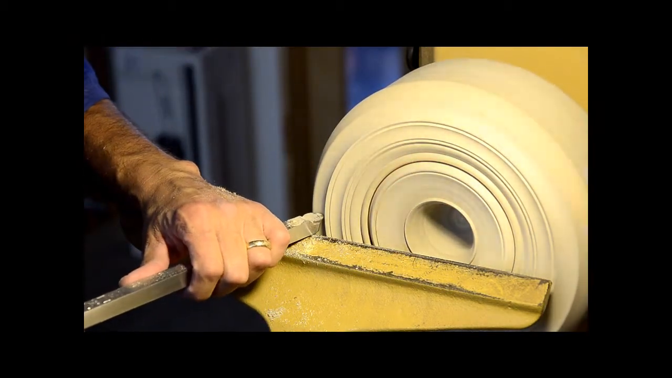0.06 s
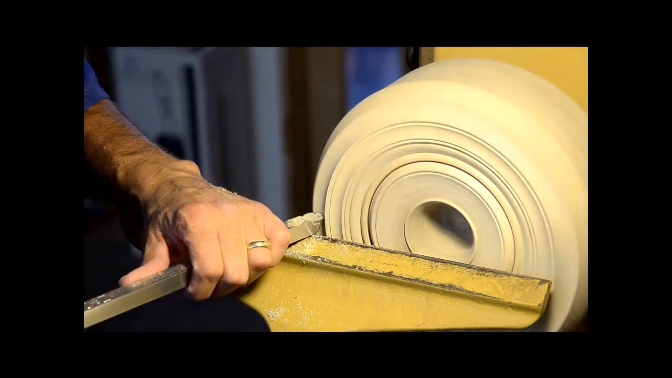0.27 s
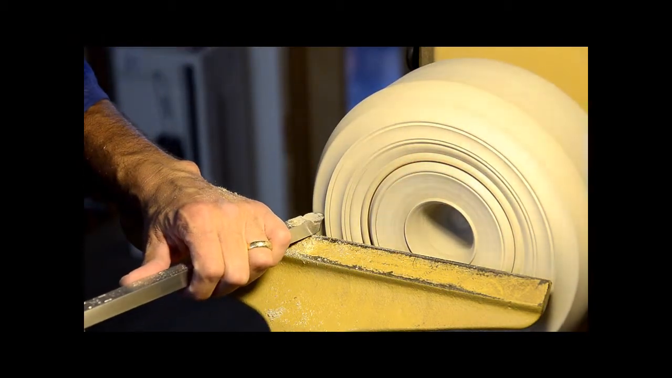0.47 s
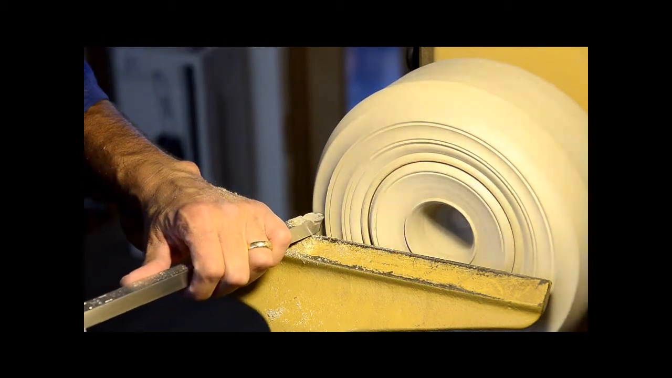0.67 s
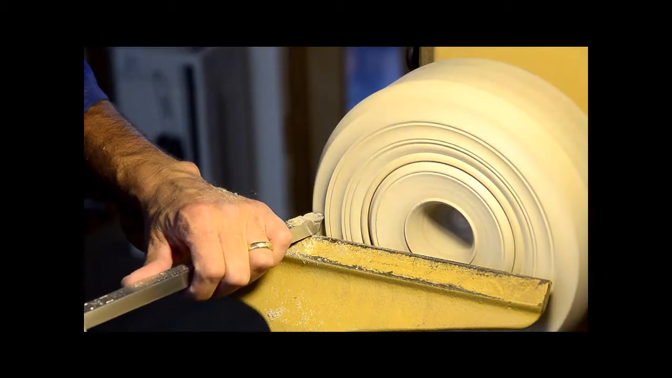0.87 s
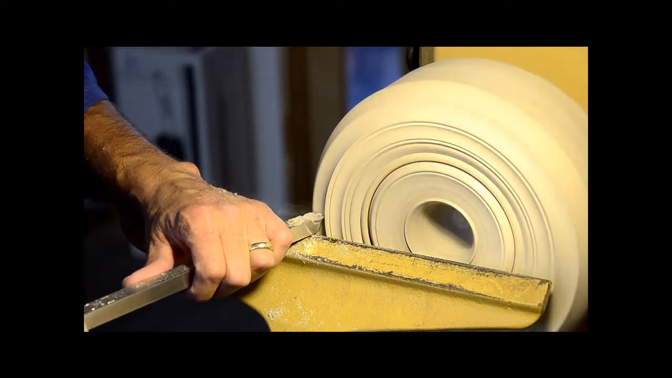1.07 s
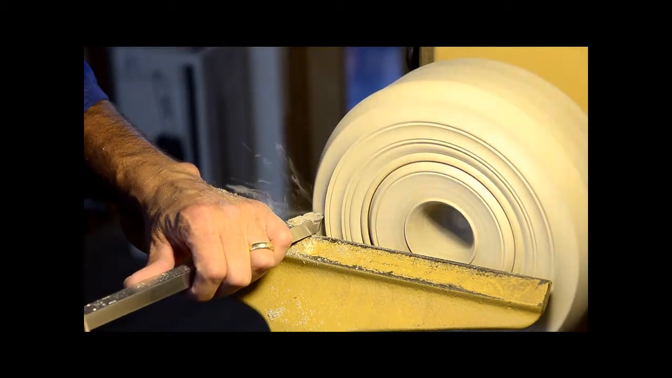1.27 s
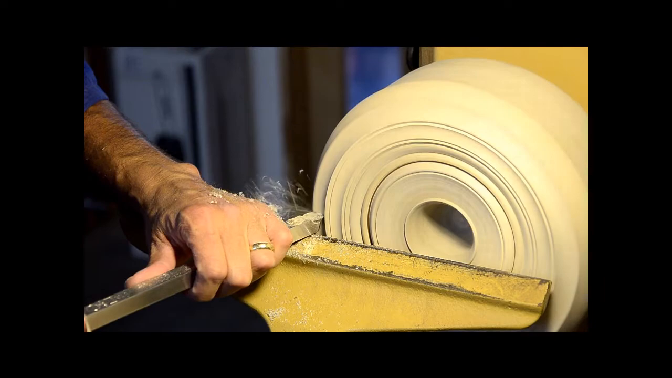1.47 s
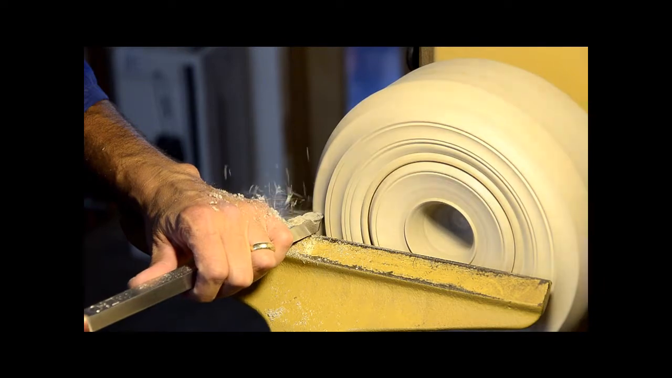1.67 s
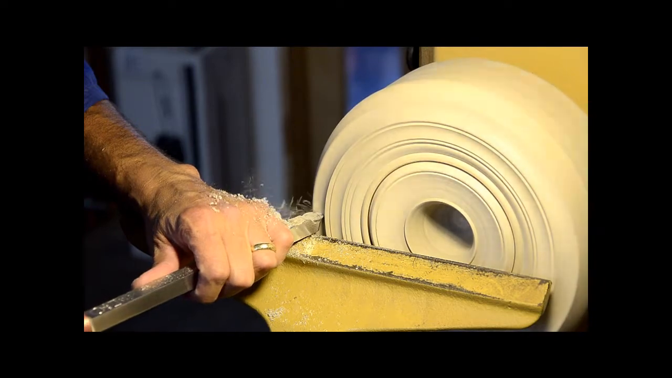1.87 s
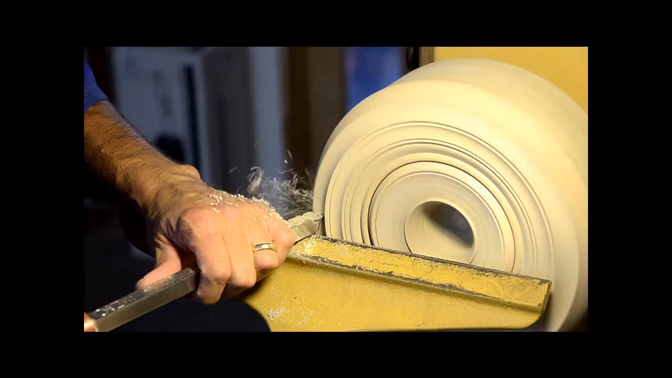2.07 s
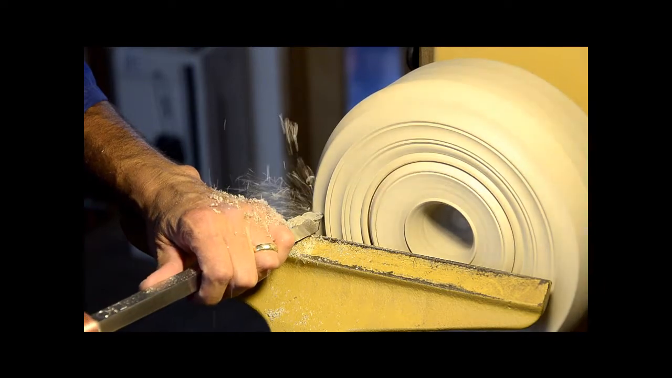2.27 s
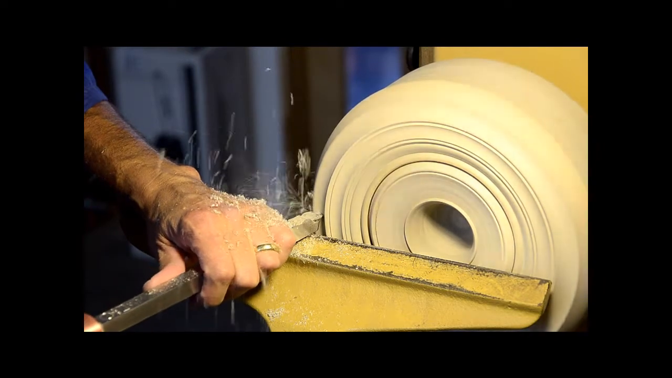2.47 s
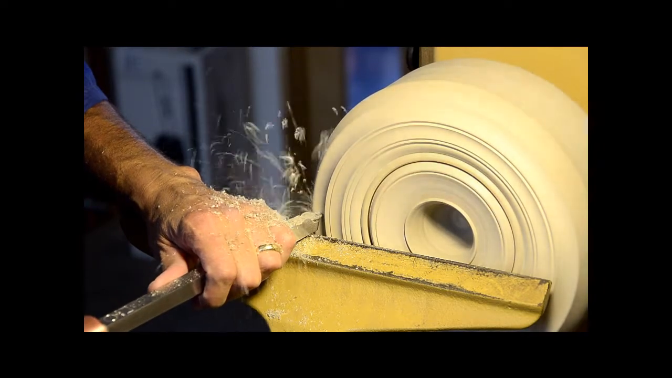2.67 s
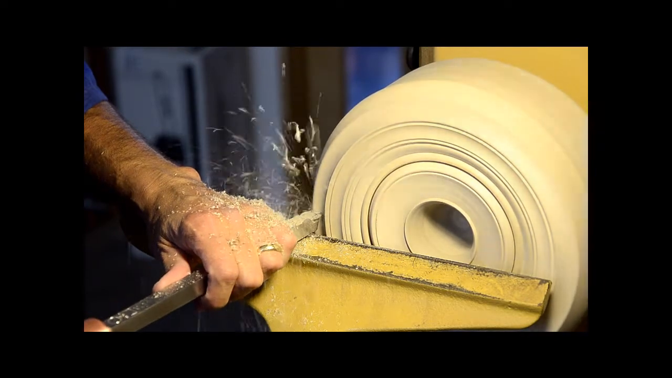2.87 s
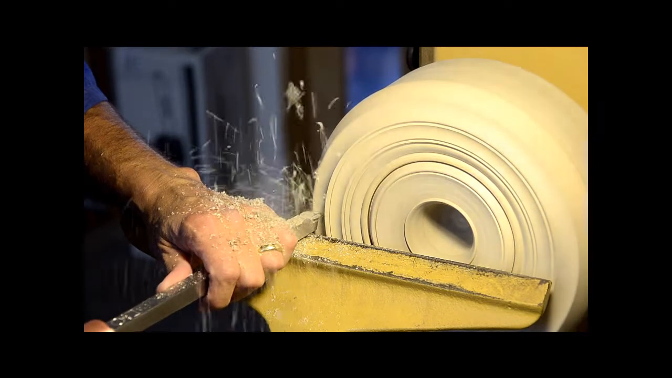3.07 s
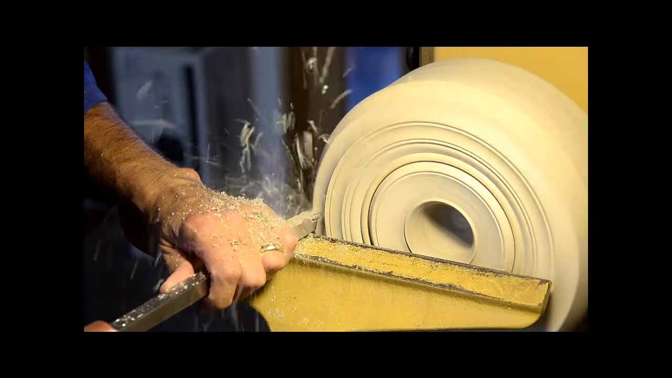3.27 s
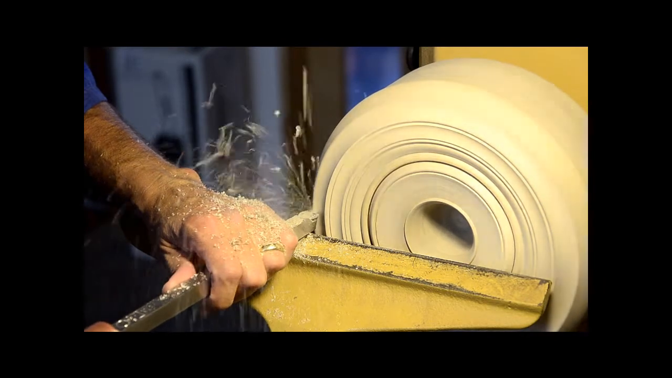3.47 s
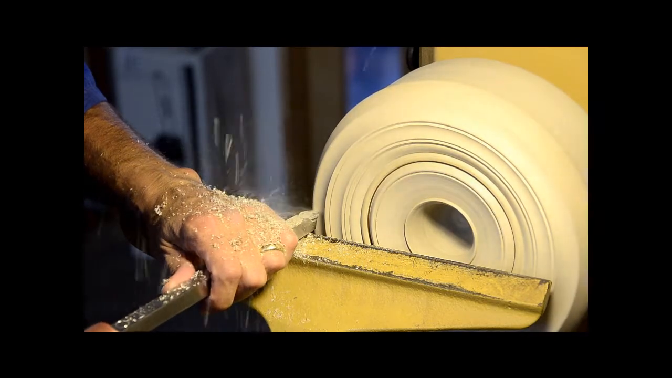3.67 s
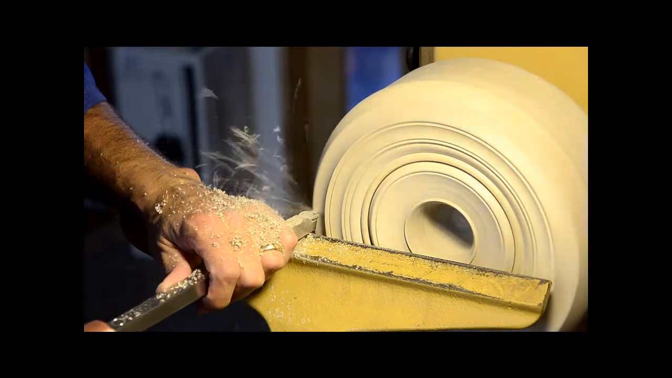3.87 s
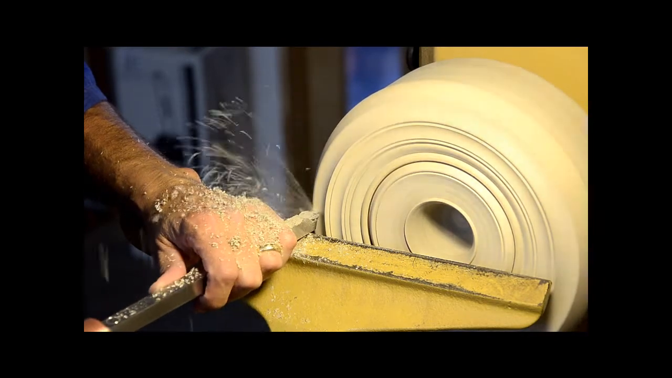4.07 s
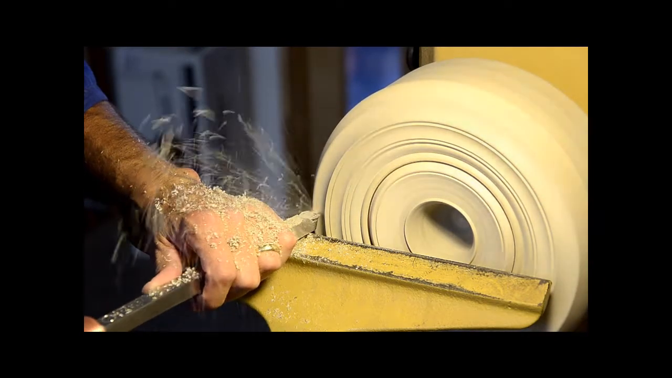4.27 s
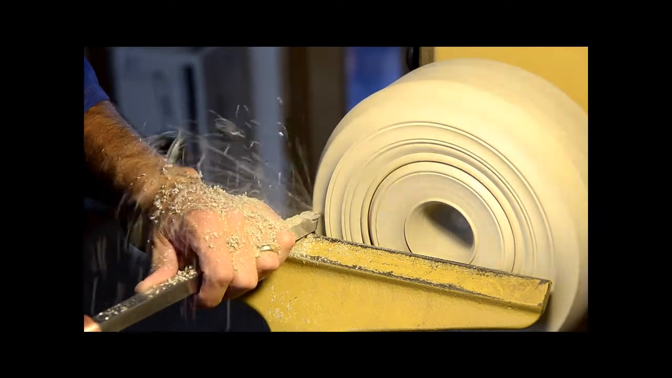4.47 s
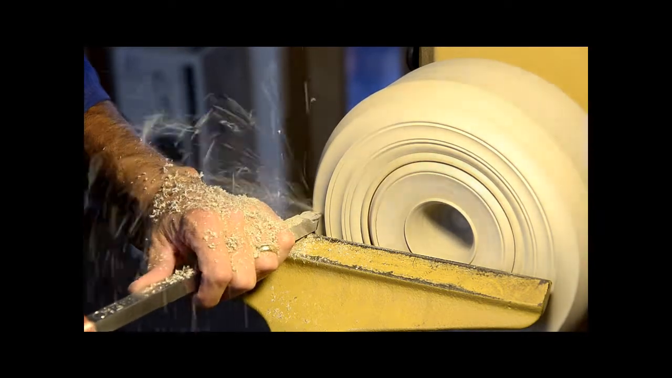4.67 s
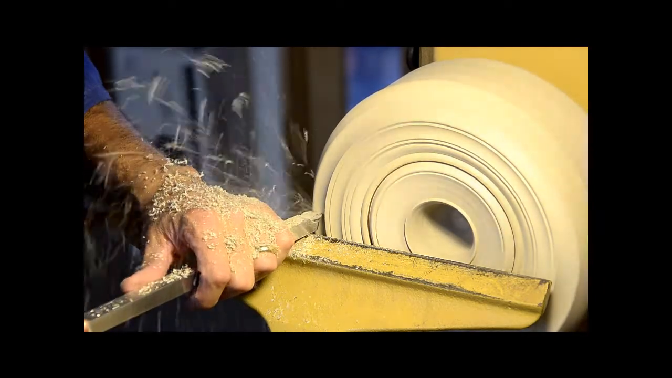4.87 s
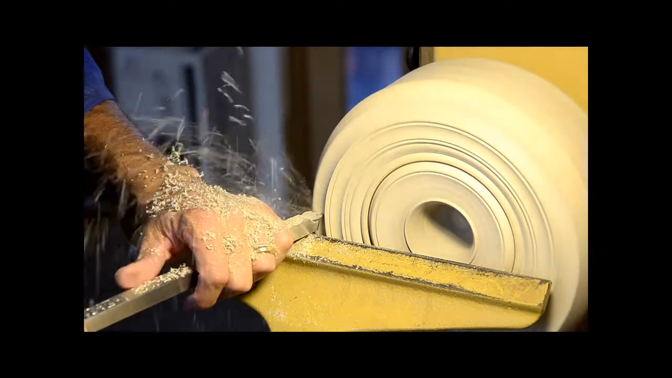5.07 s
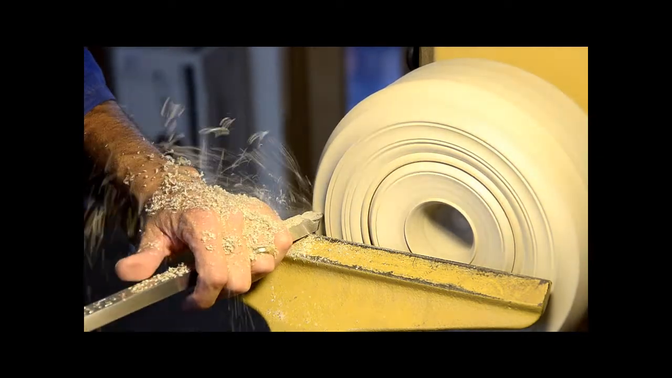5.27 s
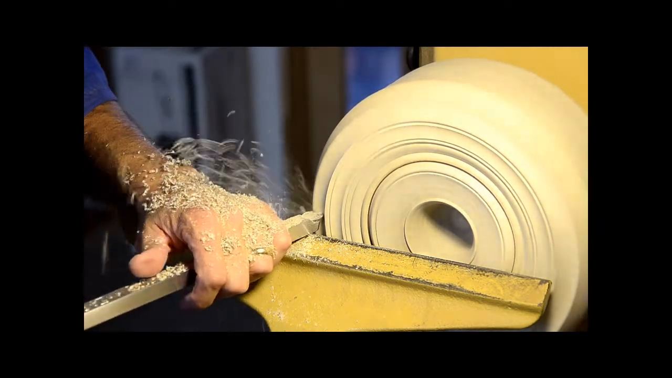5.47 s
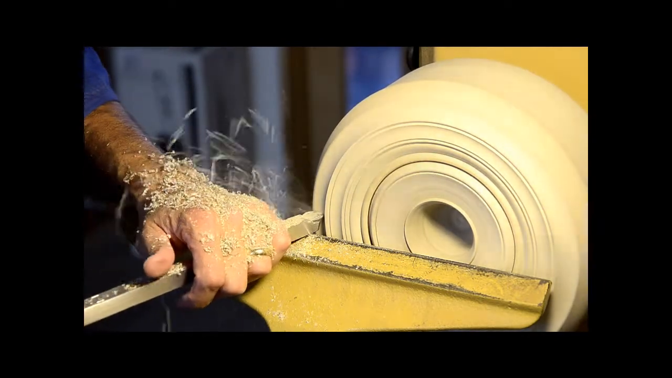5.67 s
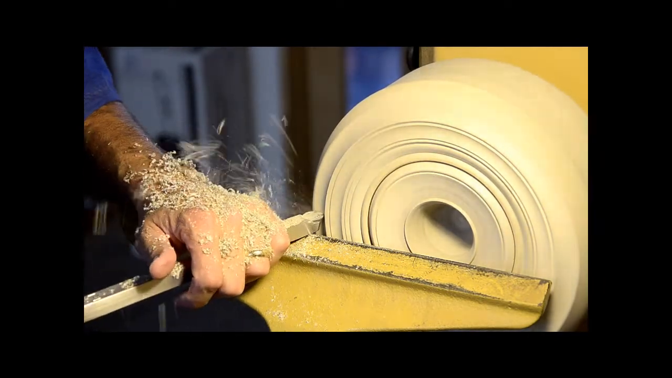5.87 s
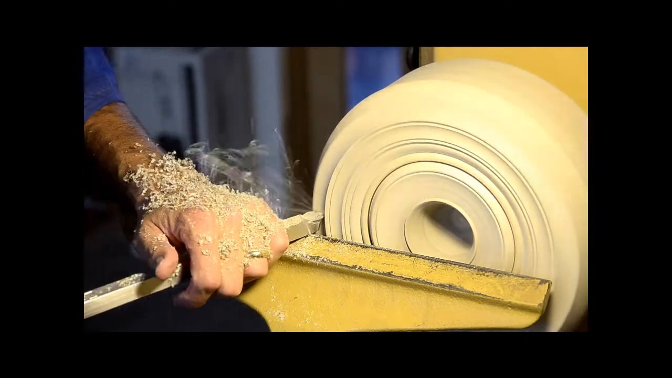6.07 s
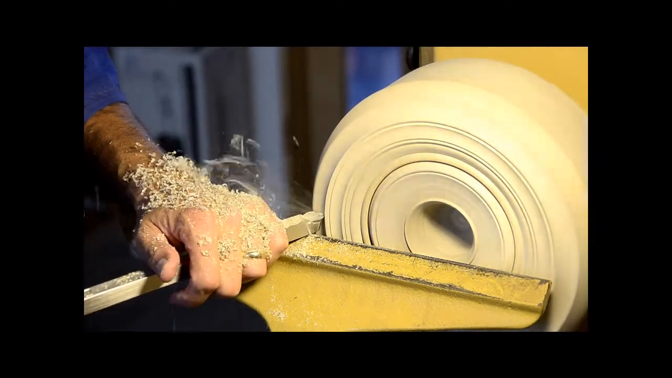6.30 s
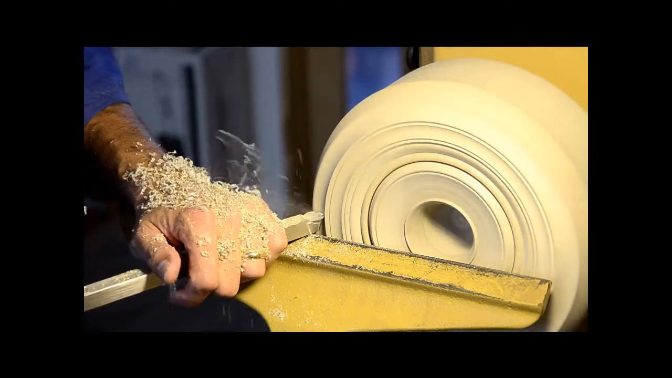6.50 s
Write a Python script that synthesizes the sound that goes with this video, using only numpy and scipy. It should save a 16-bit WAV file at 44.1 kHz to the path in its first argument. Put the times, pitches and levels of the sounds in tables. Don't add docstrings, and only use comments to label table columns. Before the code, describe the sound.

A steady lathe hum, then a gouge meets the fast-spinning wood with a pulsing bright hiss that deepens into a chattering groan and eases.

```python
import sys
import numpy as np
from scipy import signal
from scipy.fft import rfft, irfft, next_fast_len
from scipy.io import wavfile
from scipy.ndimage import uniform_filter1d, map_coordinates

SR = 44100
rng = np.random.default_rng(int(sys.argv[2]) if len(sys.argv) > 2 else 0)


def field_ratio(decibels):
    return 10 ** (np.asarray(decibels, dtype=float) / 20)


def dump_mix(stems):
    frames = np.atleast_2d(stems).T
    limited = np.clip(frames, -1, 1)
    pcm = np.round(limited * 32767).astype(np.int16)
    wavfile.write(sys.argv[1], SR, pcm)


N = 288414
TIME = np.arange(N) / SR
TURN_SAMPLES = 3382
ANGLE = np.arange(N) % TURN_SAMPLES / TURN_SAMPLES
MIDDLE_DB = -43


def edge():
    return field_ratio(-3.0) * ring(tear())


# freq_hz, level_db
STEEL = [(1290, -40), (2200, -68), (2400, -7.5), (4070, -3.5), (5280, -1.5), (6170, -0.5), (8850, -10),
         (10100, -8.5), (11500, -16), (14100, -17), (14700, -33), (15600, -46)]
# freq_hz, width_hz, gain_db
STEEL_MODES = [(3500, 22, 3), (2812, 40, 4)]


def tear():
    hiss_db, upper_db, fine_db = hand()
    sizzle_db = -5 + fine_db
    fizz_db = -60 + 0.89 * (hiss_db - MIDDLE_DB) + 0.65 * fine_db - hiss_db
    hiss_rim = figure_db()
    fizz_rim = 2.1 * hiss_rim
    figure = surface(0.66, smooth_size=150)
    fibres = rng.standard_normal(N) * field_ratio(0.6 * surface(0.1, smooth_size=12))
    ridges = surface(0.75)
    bands = [
        (2340, 5230, 0.016, 0.85 * hiss_rim + 0.92 * figure, 1.02 * ridges + 0.44 * fibres),
        (5470, 7950, upper_db, 1.73 * hiss_rim + 1.08 * figure, 0.55 * ridges + 0.57 * fibres),
        (8540, 10400, sizzle_db, 1.55 * hiss_rim + 0.34 * fizz_rim + 2.2 * figure, fibres),
        (11200, 22000, fizz_db, 1.0 * fizz_rim + 2.0 * figure, fibres)]
    total = 0
    for low, high, level_db, rim, grains in bands:
        def shape(hz):
            skirts_db = 10 * np.log10(1 + (low / (hz + 1)) ** 24 + (hz / high) ** 24)
            return along(STEEL, hz) + bumps_db(STEEL_MODES, hz) - skirts_db

        total = total + field_ratio(hiss_db + level_db) * unit(filtered(grains * field_ratio(rim), shape))
    return total


# time_s, stretch_ratio
GLIDE = [(.5, 1.13), (1.3, 1.13), (2, 1.1), (2.5, 1.06), (3, 1.03), (3.5, 1), (4, 1.03), (4.5, 1.07),
         (5, 1.103), (5.7, 1.135), (6.54, 1.14)]
# freq_hz, width_hz, relative_db
GLIDING = [(7080, 300, 0), (8050, 250, -8), (9250, 350, 0), (10220, 350, 0), (11270, 250, -6),
           (12340, 400, 0), (13450, 400, 0)]
# usual_db, change_db, at_s, half_length_s
CLEAR = [
    (8.5, -5, 5.05, 0.31),
    (8, -6.5, 1.77, 0.36),
    (2, 13, 5.4, 0.52),
]
# at_s, length_s, freq_hz, width_hz, gain_db
RINGS = [(.9, .55, 3900, 110, 13), (.8, .45, 6380, 350, 8), (1.1, .7, 13750, 300, 7),
         (1.5, .5, 4870, 150, 5), (1.9, .6, 4520, 120, 9), (2.5, .45, 5250, 150, 6),
         (3.32, .3, 5140, 200, 11), (3.4, .6, 6170, 350, 9), (2.8, .4, 3630, 90, 4),
         (3.8, .2, 5200, 220, 6), (4.1, .25, 4230, 100, 7), (4.15, .3, 3800, 350, 4),
         (2.15, .2, 4600, 400, 6), (4.4, .4, 5270, 130, 6), (4.8, .4, 4510, 130, 8),
         (4.9, .35, 4890, 100, 6), (5.1, .4, 6000, 200, 5), (5.4, .45, 5150, 260, 8),
         (6.1, .6, 4420, 170, 10), (6.35, .3, 6740, 200, 7), (6.2, .5, 13800, 350, 6)]


def ring(torn):
    hz, t, z = signal.stft(torn, SR, nperseg=1024)
    resting_hz = hz[:, None] / curves(GLIDE, t)[0]
    groups = GLIDING[:2], GLIDING[2:4], GLIDING[4:]
    ring_db = 0
    for (usual, change, at, half), group in zip(CLEAR, groups):
        modes = [(centre, width, field_ratio(db)) for centre, width, db in group]
        ring_db = ring_db + (usual + change * bell(t, at, half)) * bumps_db(modes, resting_hz)
    for at, length, centre, width, db in RINGS:
        ring_db = ring_db + bumps_db([(centre, width, db)], hz)[:, None] * bell(t, at, length)
    lesser = uniform_filter1d(rng.standard_normal(z.shape), 2, axis=0)
    lesser_db = 2.2 * unit(uniform_filter1d(lesser, 45, axis=1))
    return signal.istft(z * field_ratio(ring_db + lesser_db), SR, nperseg=1024)[1][:N]


# time_s, depth_db, edge_shear_db, shaving_fineness_db
FEED = [(.52, -57.5, -4, 3), (.9, -53.5, -5.5, 2), (1.2, -51, 2, 4.5), (1.6, -48, 2.5, 2.5),
        (1.95, -46.5, 0, 1), (2.4, -44, 1, -1.5), (2.8, -45.5, -0.5, -2.5), (3.1, -38, -2, -2),
        (3.4, -34.5, -2, -0.5), (3.75, -44.5, -2.5, -5), (4.0, -41, -2.5, -5.5), (4.3, -37.5, -4, -3),
        (4.6, -37, -2, -1.5), (4.85, -37, -0.5, 0), (5.3, -42.5, 2.5, 1), (5.55, -44.5, 4.5, 2.5),
        (5.9, -41.5, 0.5, -2.5), (6.54, -44.5, 0.5, 1.5)]
# at_s, extra_depth_db, half_length_s
PUSHES = [(0.612, 2, 0.04), (1.28, 5.5, 0.047), (1.557, 3.5, 0.094), (2.125, 4.5, 0.038),
          (2.334, 5.5, 0.058), (2.63, 5.5, 0.1), (2.87, 5, 0.094), (3.264, 3, .08), (3.54, 3.5, 0.075),
          (3.864, 5.5, 0.074), (3.98, -4.5, 0.025), (4.088, 3.5, 0.11), (4.496, 2, 0.028), (5.607, 1, .04),
          (6.3, 1, 0.2)]


def hand():
    depth_db, shear_db, fine_db = curves(FEED)
    pushes_db = sum(db * bell(TIME, at, half) for at, db, half in PUSHES)
    return depth_db + pushes_db, shear_db, fine_db


def touching():
    return np.clip((TIME - .515) / 0.0092, 0, 1)


# angle_turns, half_width_turns, gain_db, clearest_at_s, lasts_s
FIGURE = [(0.2, 0.11, -4, 3, 3.7), (0.72, 0.098, -2.5, 2.4, 5.8), (0.23, 0.068, 4.5, 3.6, 1.7),
          (0.5, 0.033, -1, .9, 0.99), (0.502, 0.069, 1.5, 2.7, 3), (0.903, 0.12, 3, 3.28, 1),
          (.97, 0.03, 1, 5.5, 0.32), (0.245, 0.021, 5, 1.05, 0.3), (0.87, 0.13, -3.5, 0.52, 0.6),
          (0.11, 0.065, 1, 0.55, 0.45), (.03, .03, 3, 7.7, 1.1)]


def figure_db():
    return sum(db * near(at, half) * bell(TIME, s, lasts) for at, half, db, s, lasts in FIGURE)


def blank():
    return knock() + chatter() + groan() + thud()


# freq_hz, level_db
WOOD = [(150, -36), (240, -14), (400, -22), (700, -6), (1000, -6.5), (1600, -5.5), (2200, -7.5),
        (2500, -14.5), (3200, -25.5)]
# freq_hz, width_hz, gain_db
WOOD_MODES = [(248.6, 6.6, 6), (1210, 62, 13.5), (1257, 60, 6), (1067, 28, 7.5), (1848, 76, 11.5),
              (1998, 62, 10.5), (2073, 50, 14)]
KNOT = 0.612, 0.058, 3.1


def knock():
    depth_db, shear_db, _ = hand()
    bite_db = 0.34 * np.maximum(curves(BITE)[0] - ONSET_DB, 0)
    body_db = -49.5 + 0.7 * (depth_db - MIDDLE_DB) + 0.3 * shear_db + bite_db
    angle, half, knot_db = KNOT
    ridges = surface(0.6) * field_ratio(1.27 * knot_db * near(angle, half))
    body = filtered(ridges, lambda hz: along(WOOD, hz) + bumps_db(WOOD_MODES, hz))
    return field_ratio(body_db) * unit(body)


# time_s, chatter_db
BITE = [
    (2.5, -77),
    (2.94, -49.5),
    (3.1, -45.5),
    (3.2, -33.5),
    (3.5, -37),
    (3.78, -49.5),
    (3.92, -49.5),
    (4.2, -48.5),
    (4.7, -63.5),
]
# angle_turns, gain_db
CATCH = [
    (.04, -14),
    (.18, -6.5),
    (.46, 4),
    (.6, 9),
    (.83, 3),
    (.93, 7),
]
ONSET_DB = -53.5


def chatter():
    catch_db = np.interp(ANGLE, *np.transpose(CATCH), period=1)
    phase = 2 * np.pi * np.cumsum(859 + 2.5 * wobble(9)) / SR
    shake = field_ratio(1.26 * catch_db + 0.3 * wobble(30)) * np.sin(phase)
    return field_ratio(curves(BITE)[0]) * unit(shake)


def groan():
    starts_s, rise_s = 3.0, 0.17
    groan_db = -52 + 0.44 * (curves(BITE)[0] - ONSET_DB)
    climb = np.minimum((ANGLE - .04) % 1 / .6, 1)
    phase = 2 * np.pi * np.cumsum(630 + 200 * climb ** 1.5 + 8 * wobble(45)) / SR
    slide = np.sin(np.pi * climb) ** 0.43 * field_ratio(1.3 * wobble(33)) * np.sin(phase)
    slide = slide * np.clip((TIME - starts_s) / rise_s, .1, 1)
    return field_ratio(groan_db - 10.5) * unit(slide)


def thud():
    low = filtered(surface(0.98), lambda hz: -20 * np.log10(1 + ((hz - 248) / 18) ** 2))
    return field_ratio(curves(BITE)[0] - 33.0) * unit(low)


# time_s, level_db
NICK = [
    (.55, -44),
    (.95, -39),
    (1.15, -42),
    (1.3, -63),
]


def nick():
    since_s = (ANGLE - .415) % 1 * TURN_SAMPLES / SR
    burst = rng.standard_normal(N) * field_ratio(curves(NICK)[0] - 60 * since_s / .016)
    colour = [(3000, -22), (11000, -12), (13500, -2), (15500, -14)]  # Hz, dB
    return filtered(burst, lambda hz: along(colour, hz))


def motor():
    return rush() + hum() + whine() + bed()


# freq_hz, level_db
MACHINE = [(15, -55), (30, -24), (60, -14), (100, -19.5), (150, -13), (250, -19), (420, -18), (600, -6.5),
           (1000, -7.5), (2600, -12.5), (5500, -25.5), (8350, -19), (10000, -17.5), (11200, -25.5),
           (12500, -42), (15500, -50)]
# freq_hz, width_hz, gain_db
MACHINE_MODES = [(840, 79, 0), (1170, 48, 8.5), (331, 88, 11), (10760, 300, 12), (11200, 150, 3)]


def rush():
    spindle = 0.54 * surface(0.894) + 0.88 * rng.standard_normal(N)
    air = filtered(spindle, lambda hz: along(MACHINE, hz) + bumps_db(MACHINE_MODES, hz))
    return field_ratio(-54.5) * unit(air)


# freq_hz, level_db
HUM = [(456.7, -70), (783, -65), (1158.2, -59), (1190.8, -66), (1575, -73)]


def hum():
    load_db = 0.35 * (curves(FEED)[0] - FEED[0][1])
    total = 0
    for hz, db in HUM:
        level_db = db + 3.0 + 0.82 * wobble(10) - (hz < 500) * load_db
        total = total + field_ratio(level_db) * np.sin(2 * np.pi * hz * TIME + 0.7 * wobble(6))
    return total


# step_number, level_db
WHINE = [(-17, -75.7), (-14, -76.1), (-12, -74.9), (-9, -71.2), (-8, -71.5), (-7, -73.7), (-6, -71.3),
         (-3, -74.2), (-2, -72.5), (0, -58.6), (1, -64.3), (2, -60.6), (3, -71.3), (4, -69), (9, -72.5),
         (10, -73), (11, -70), (12, -71.1), (13, -66.1), (14, -65.7), (15, -69.3), (16, -70.7)]


def whine():
    total = 0
    for step, db in WHINE:
        phase = rng.uniform(0, 2 * np.pi)
        total = total + field_ratio(db + 3) * np.sin(2 * np.pi * (9837.4 + 65.26 * step) * TIME + phase)
    return total * field_ratio(0.21 * wobble(4.7))


# time_s, sway_db, buzz_db
BED = [
    (0, -95, -92),
    (2.9, -95, -92),
    (3.05, -79, -92),
    (4.5, -79, -90),
    (4.75, -79, -77),
    (5.1, -79, -90),
    (6.1, -80, -88),
    (6.54, -81, -77),
]


def bed():
    sway_db, buzz_db = curves(BED)
    sway = np.sin(2 * np.pi * 36.5 * TIME + .4 * wobble(2.9)) * field_ratio(sway_db + 5.5 + 1.3 * wobble(3.3))
    buzz = np.sin(2 * np.pi * 119 * TIME + 1.1 * wobble(3)) * field_ratio(buzz_db + 7.5)
    return sway + buzz


def surface(memory, smooth_size=1):
    fresh = rng.standard_normal((N // TURN_SAMPLES + 9, TURN_SAMPLES))
    fresh = uniform_filter1d(fresh, smooth_size, axis=1, mode="wrap")
    turns = signal.lfilter([1], [1, -min(memory, .97)], fresh, axis=0)
    return unit(turns[8:].ravel()[:N])


def near(angle, half):
    return bell((ANGLE - angle + .5) % 1, 0.493, half)


def bell(x, at, half):
    return np.exp(-((x - at) / half) ** 2)


def unit(x):
    return x / np.sqrt(np.mean(x ** 2) + 1e-20)


def along(points, hz):
    f, v = np.transpose(points)
    return np.interp(np.log(hz + 1), np.log(f + 1), v)


def curves(rows, t=TIME):
    s, *columns = np.transpose(rows)
    return [np.interp(t, s, column) for column in columns]


def wobble(rate):
    knots = rng.standard_normal(int(N * rate / SR) + 4)
    return map_coordinates(knots, [np.arange(N) * rate / SR])


def bumps_db(modes, hz):
    return sum(db / (1 + (2 * (hz - centre) / width) ** 2) for centre, width, db in modes)


def filtered(x, gain_db):
    size = next_fast_len(N + 8192)
    gain = field_ratio(gain_db(np.fft.rfftfreq(size, 1 / SR)))
    return irfft(rfft(x, size) * gain, size)[:N]


# freq_hz, width_hz, gain_db
REST_NOTCH = [(5670, 232, -20)]


def scene():
    contact = touching() * (edge() + blank() + nick())
    cut = filtered(contact, lambda hz: bumps_db(REST_NOTCH, hz))
    return (cut + motor())[None]


# freq_hz, width_hz, gain_db
NOTCHES = [(6900, 100, -8), (15020, 170, -16)]


def low_pass(x):
    return signal.sosfilt(signal.butter(12, 15720, fs=SR, output="sos"), x)


def record(dry):
    mix = filtered(dry[0], lambda hz: bumps_db(NOTCHES, hz))[None]
    return low_pass(mix)


dry = scene()
out = record(dry)
dump_mix(out)
```